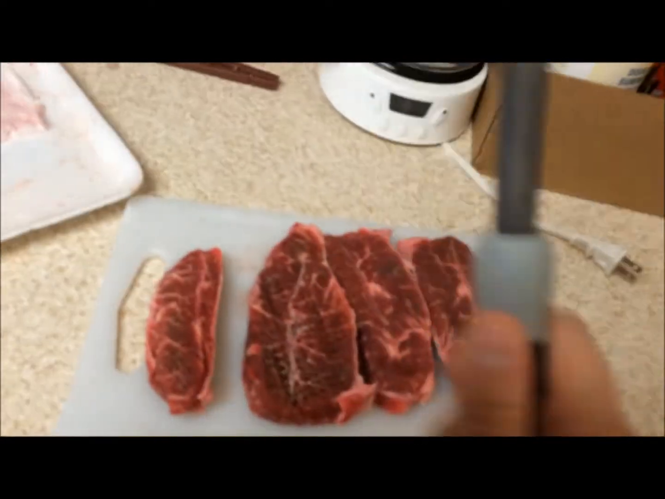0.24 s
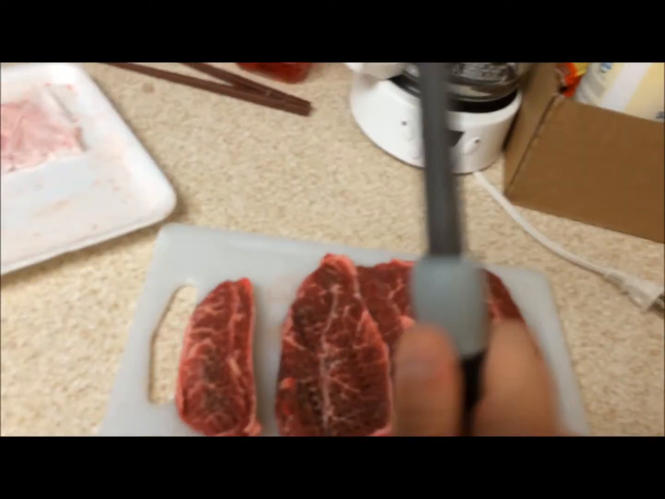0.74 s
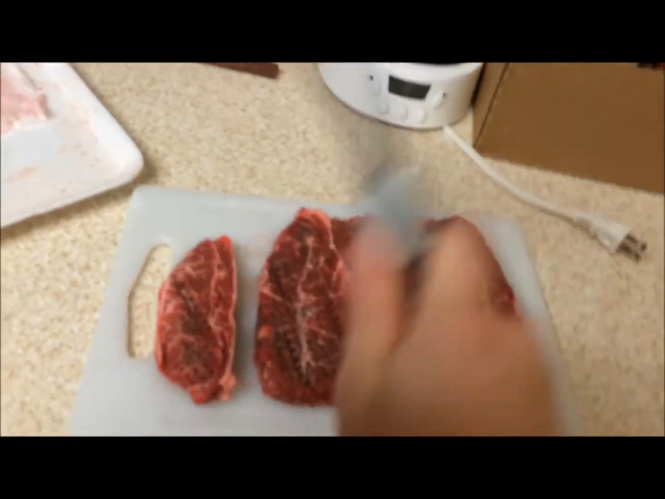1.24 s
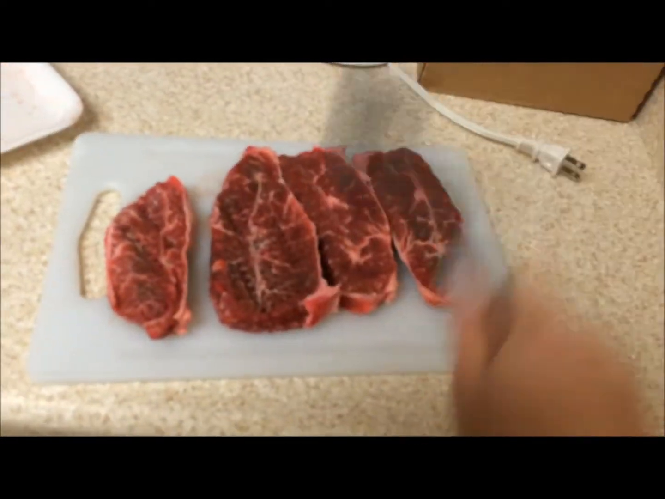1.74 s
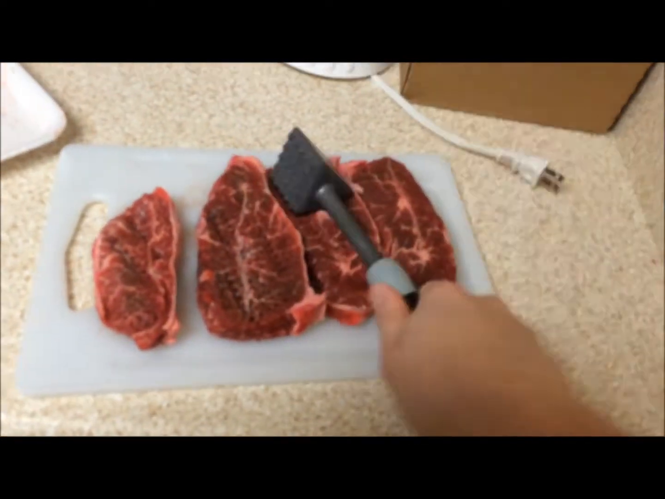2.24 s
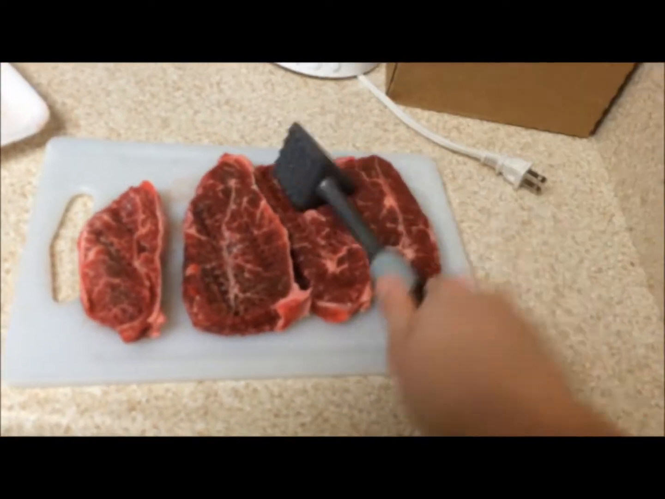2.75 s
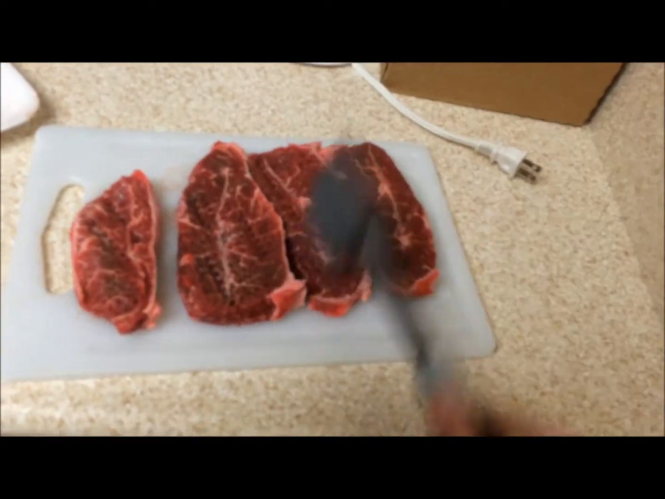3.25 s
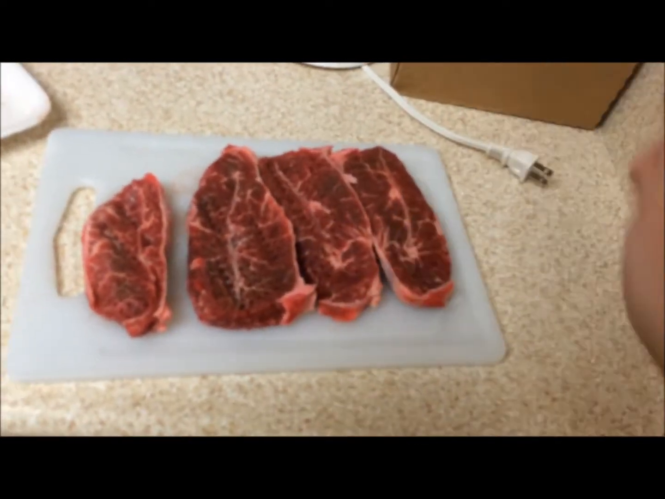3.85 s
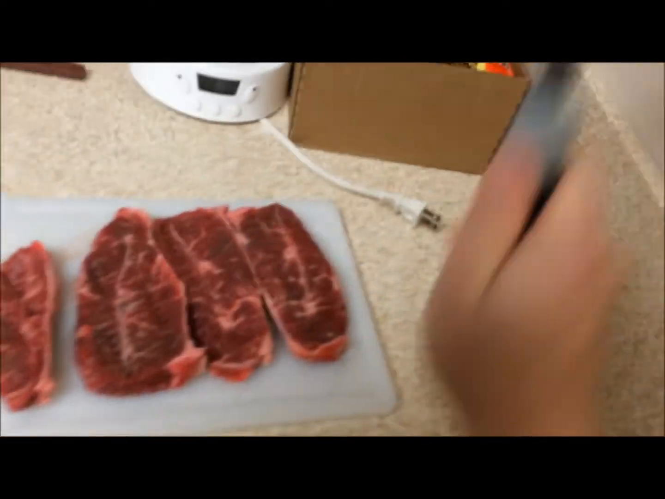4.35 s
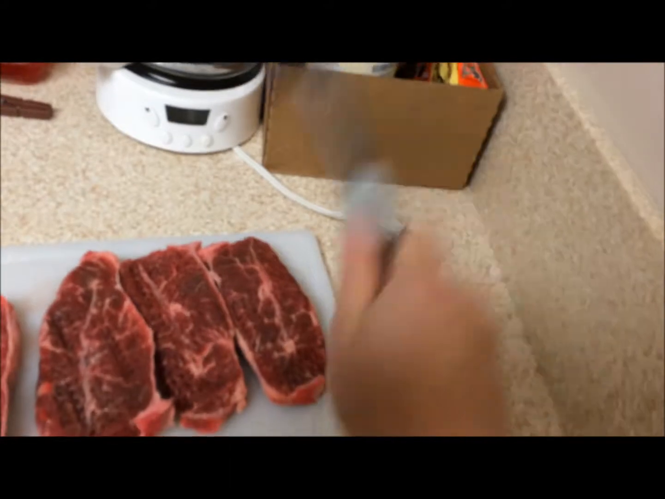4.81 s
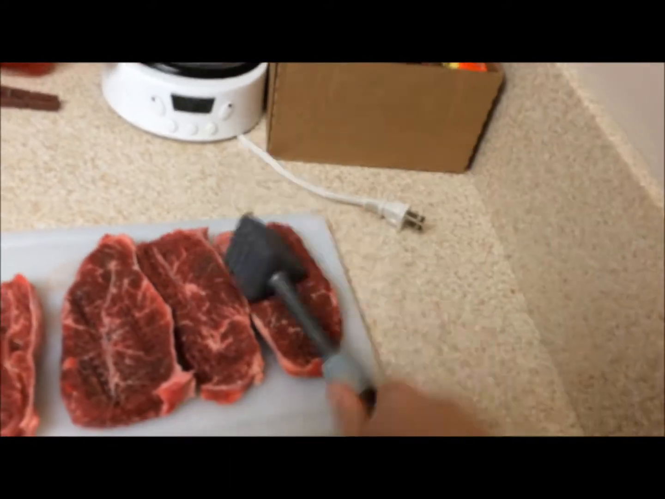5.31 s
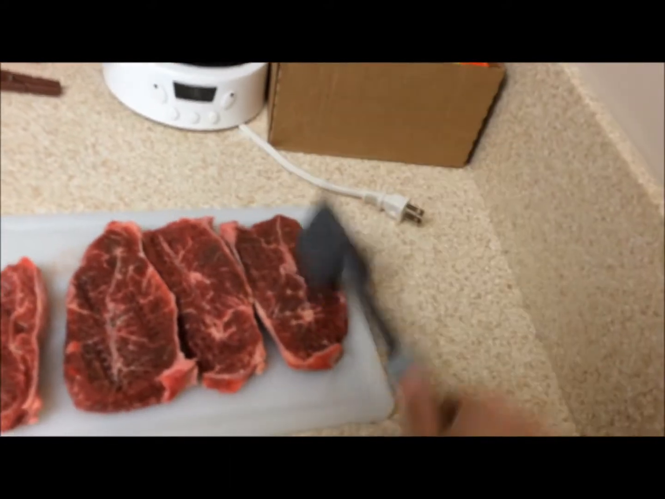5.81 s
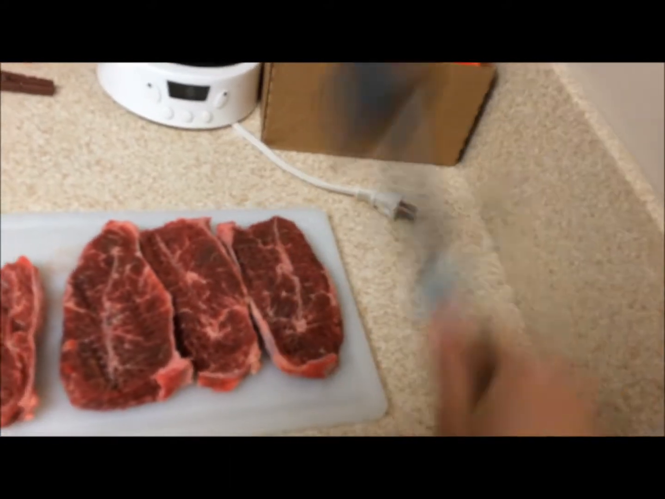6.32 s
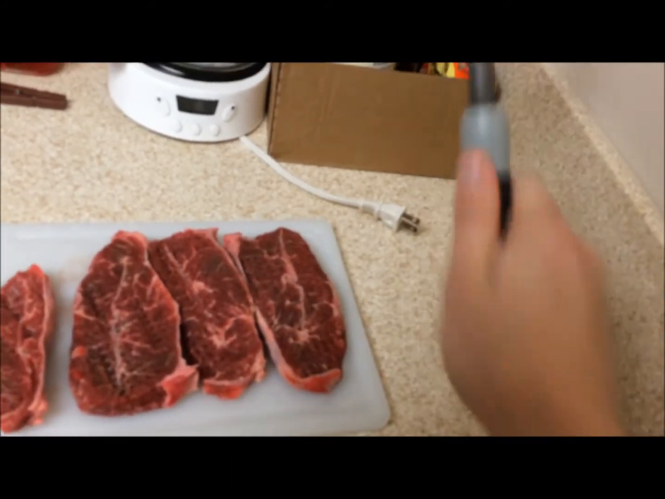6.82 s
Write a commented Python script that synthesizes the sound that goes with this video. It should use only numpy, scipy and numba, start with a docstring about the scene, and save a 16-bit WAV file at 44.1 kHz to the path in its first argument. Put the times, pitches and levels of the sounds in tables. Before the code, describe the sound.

Steady close-up blows of a meat mallet, each a wet slap and hard board knock, with the counter booming and the room ringing briefly.

```python
"""Steaks pounded on a kitchen counter

In a small hard kitchen, close to a phone's microphone, a mallet strikes meat on a plastic board sixteen times.
Each blow is a dull touch, a wet slap of noise clicks, then a board knock and a ringing mallet head.
Damped sines make the counter boom, and decaying noise rings the room over a steady quiet hush.
The phone's limiter flattens each attack, so the room swells behind it.
"""
import sys
import numpy as np
from scipy import signal
from scipy.fft import rfft, irfft
from scipy.io import wavfile
from scipy.ndimage import uniform_filter1d, minimum_filter1d
from numba import njit

SR = 44100
rng = np.random.default_rng(int(sys.argv[2]) if len(sys.argv) > 2 else 0)


def persist_wave(psi):
    """Save psi, clipped to +-1, as 16-bit WAV."""
    counts = np.round(np.clip(psi, -1, 1) * 32767).astype(np.int16)
    wavfile.write(sys.argv[1], SR, np.atleast_2d(counts).T)


N = 311787
T = np.arange(int(0.7 * SR)) / SR  # time axis of one blow, seconds


def undb(db):
    """Decibels to gain."""
    return 10 ** (np.asarray(db) / 20)


def unit(x):
    """Scale to rms 1."""
    return x / np.sqrt(np.mean(x ** 2))


def at(points, hz):
    """Read (frequency, value) points on a log-frequency axis."""
    point_hz, value = np.transpose(points)
    return np.interp(np.log(np.maximum(hz, 1)), np.log(point_hz), value)


def colour(x, points):
    """Shape the spectrum by (frequency, dB) points; rms 1."""
    hz = np.arange(len(x) // 2 + 1) * SR / len(x)
    return unit(irfft(rfft(x) * undb(at(points, hz)), len(x)))


def band(x, lo_hz, hi_hz):
    """Band-pass; rms 1."""
    sos = signal.butter(2, [lo_hz, hi_hz], "band", fs=SR, output="sos")
    return unit(signal.sosfilt(sos, x))


def noise():
    """White noise, one blow long."""
    return rng.standard_normal(len(T))


def fade(t60_s):
    """Exponential decay, falling 60 dB in t60_s."""
    return np.exp(-np.log(1000) * T / t60_s)


def rise(seconds):
    """Smooth onset."""
    return 1 - np.exp(-(T / seconds) ** 2)


def add(out, start_s, x):
    """Mix x into out from start_s, or from the beginning if that is earlier."""
    i = max(int(start_s * SR), 0)
    out[i:i + len(x)] += x[:max(len(out) - i, 0)]


def ring(modes, scatter_db, detune):
    """Damped modes; each spot on the board weights and loads them a little differently."""
    chance = rng.standard_normal((len(modes), 2))
    total = np.zeros(len(T))
    for (pitch_hz, level_db, t60_s), (weight, load) in zip(modes, chance):
        tone = np.sin(2 * np.pi * pitch_hz * (1 + detune * load) * T)
        total += undb(level_db + scatter_db * weight) * fade(t60_s) * tone
    return total


# the blows on the board; body is how resonant the spot is
# columns: start_s, force_db, wet_slap_db, slap_brightness_db, body_db
BLOWS = [(0.1217, -2, 5, 1, -0.5), (0.5821, -5, 4.5, -2, 0), (1.0271, -2.5, -0.5, 3, 0),
         (1.4838, 0, -3, 2.5, -2.5), (1.9395, 2, -2.5, 2.5, 0), (2.394, 2, -2.5, 0.5, 4),
         (2.8672, 2.5, -6, 4, 3.5), (3.3032, 1.5, 4.5, 2, 2), (3.7535, -1.1, -1.5, 8, 4.5),
         (4.1917, 1.5, -0.5, 3.5, 2.5), (4.633, 2.1, -1.5, 6, -0.5), (5.0399, -4.1, -2.5, -1, 4.5),
         (5.4688, 3, -4.5, 5.5, -3), (5.8954, -1, -3.5, 8, 3), (6.3131, -0.5, -3, 13, 3),
         (6.7541, -3, -2, 0.5, 5.5)]
# level of the mallet's ring, freest through the middle of the run
# columns: time_s, level_db
MALLET_FREEDOM = [(0, -6), (1.5, 1), (2.1, 9.5), (3.8, 5.5), (4.7, -2), (7, -5)]


def pounding(out):
    """Mallet blows in stages; force and the spot that is hit shape the stages."""
    walls = noise()
    for start_s, force_db, wet_db, bright_db, body_db in BLOWS:
        place = spot()
        bass_db = 0.44 * force_db  # a harder blow's shorter push adds little bass
        add(out, start_s - 0.16, undb(-37.5) * swell())
        add(out, start_s - 0.017, undb(-13 + 1.5 * force_db) * touch())
        add(out, start_s - 0.0011, undb(3.5 + wet_db) * slap(place, bright_db))
        add(out, start_s - 0.00026, undb(6.5) * flex())
        add(out, start_s + 0.00051, undb(bass_db) * counter())
        # the head bottoms out on the board a moment later
        bottom_s = start_s + 0.0102
        # a resonant spot on the board knocks louder
        knock_db = 0.79 * force_db + 0.34 * body_db
        add(out, bottom_s, undb(knock_db) * knock())
        mallet_db = force_db + np.interp(start_s, *np.transpose(MALLET_FREEDOM))
        add(out, bottom_s, undb(mallet_db) * mallet())
        # a wet spot also fills the room with more treble
        echo = kitchen(walls, place, bass_db - force_db, body_db, treble_db=0.35 * wet_db)
        add(out, start_s + 0.006, undb(-6.5 + force_db) * echo)


def spot(ripple_db=2.0, spacing_hz=170):
    """Each spot of meat colours its blow with random peaks and dips, growing up to 1500 Hz."""
    hz = np.linspace(0, SR / 2, num=2048)
    knots = rng.standard_normal(size=512)
    ripple = np.interp(hz / spacing_hz, np.arange(len(knots)), knots)
    return np.c_[hz + 1, ripple_db * np.minimum(hz / 1500, 1) * ripple]


# spectrum of the wet slap, before the spot and its brightness colour it
# columns: pitch_hz, level_db [dB per Hz, relative]
SLAP_COLOUR = [(100, 1), (400, -5), (750, 1.5), (1300, 5), (2300, 3.5), (3100, -0.5), (3900, -3.5),
               (4550, -3), (5400, -4.5), (6200, -6), (10000, -12.5), (15000, -19)]


def slap(place, bright_db, grain_db=3.0, t60_s=0.018, thinning=0.62):
    """Studs burst the wet surface in tiny clicks, thinner where brighter; juice squelches just after."""
    grain = undb(grain_db * np.minimum(rng.exponential(size=len(T)), 4))
    clicks = colour(colour(noise() * grain, SLAP_COLOUR), place)
    tilt = [(1500, -thinning * bright_db), (3500, 0), (9000, (1 - thinning) * bright_db)]
    clicks = colour(clicks, tilt)
    # the squelch is a brief second swell, 9 ms in
    squelch = undb(-22) * np.exp(-((T - 0.009) / 0.0025) ** 2)
    return clicks * rise(0.0022) * (fade(t60_s) + squelch)


# spectrum of the head knocking the plastic board
# columns: pitch_hz, level_db [dB per Hz, relative]
KNOCK_COLOUR = [(100, -2.5), (350, 8), (700, -3.5), (1200, 5), (2200, 1), (3200, -7), (5000, -19),
                (8000, -23), (15000, -38)]


def knock(t60_s=0.025):
    """The squeezed meat stiffens and the head knocks the plastic board: a short noise burst."""
    return colour(noise(), KNOCK_COLOUR) * rise(0.00069) * fade(t60_s)


# modes of the mallet's head and shaft, before scatter and detuning
# columns: pitch_hz, level_db [relative], t60_s
MALLET_MODES = [(1157, -34, .3), (1506, -36, .3), (1937, -34, .33), (1972, -37, .33), (2083, -43, .45),
                (2298, -28, .37), (3043, -39, .3)]


def mallet():
    """The mallet's head and shaft ring as damped sines."""
    return ring(MALLET_MODES, scatter_db=3.5, detune=0.0019)


# modes of the counter's first heavy flex, before scatter and detuning
# columns: pitch_hz, level_db [relative], t60_s
FLEX_MODES = [(79, -10, 0.077), (131, -2.5, 0.049), (349, 4, 0.017)]


def flex():
    """The counter flexes under the blow; soft meat spreads the push over a few milliseconds."""
    return rise(0.0055) * ring(FLEX_MODES, scatter_db=5.5, detune=0.012)


# modes of counter and board ringing on, before scatter and detuning
# columns: pitch_hz, level_db [relative], t60_s
COUNTER_MODES = [(48.3, -24.5, 0.34), (76, -16.5, 0.32), (137.8, -11.5, 0.39), (164.3, -15, 0.33),
                 (183, -16.5, 0.31), (232.9, -8.5, 0.28), (301, -15, 0.29), (332, -23.5, 0.17),
                 (375.1, -17.5, 0.19), (401.4, -19, 0.19), (427, -22.5, 0.41), (507.5, -25.5, 0.43),
                 (590, -26, 0.38), (693, -33.5, 0.56), (843, -27, 0.34), (1006, -24.5, 0.41)]


def counter():
    """Counter and board boom on as damped sines with a soft onset."""
    return rise(0.0053) * ring(COUNTER_MODES, scatter_db=1.06, detune=0.00678)


def touch(thump_hz=135, rustle_db=-9, press_s=0.0075, t60_s=0.046):
    """The head first presses into the soft meat: a small dull bump and a wet rustle."""
    rustle = band(band(noise(), 100, 2700), 100, 2700)
    bump = np.sin(2 * np.pi * thump_hz * T)
    return (bump + undb(rustle_db) * rustle) * rise(press_s) * fade(t60_s)


# spectrum of the soft low swell around each blow
# columns: pitch_hz, level_db [dB per Hz, relative]
SWELL_COLOUR = [(40, -4.5), (140, 6.5), (300, -4.5), (900, -16), (2000, -18), (4000, -29.5), (9000, -36.5),
                (15000, -46)]


def swell(peak_s=0.18, width_s=0.11):
    """A soft low swell of noise around each blow, peaking just after it."""
    return colour(noise(), SWELL_COLOUR) * np.exp(-((T - peak_s) / width_s) ** 2)


# the board hops and claps back on the counter
# columns: start_s, level_db
CLAPS = [(0.6205, 3)]
# spectrum of the clap
# columns: pitch_hz, level_db [dB per Hz, relative]
CLAP_COLOUR = [(300, -11), (1500, -7.5), (3100, 2), (3800, -8), (4600, 2.5), (6500, -6), (10000, -9.5),
               (15000, -22)]


def board_claps(out, t60_s=0.017):
    """Thin plastic lands flat on the counter: short, bright noise."""
    for start_s, level_db in CLAPS:
        clap = colour(noise(), CLAP_COLOUR) * rise(0.0033) * fade(t60_s)
        add(out, start_s, undb(level_db) * clap)


# a faint swish on one downswing
# columns: start_s, level_db
SWISHES = [(6.263, -42)]


def swishes(out, t60_s=0.37):
    """A short bright hiss of band-passed noise."""
    for start_s, level_db in SWISHES:
        hiss = band(noise(), 2500, 12000) * rise(0.0098) * fade(t60_s)
        add(out, start_s, undb(level_db) * hiss)


# spectrum of the kitchen's reflections, before each blow colours them
# columns: pitch_hz, level_db [dB per Hz, relative]
ROOM_COLOUR = [(30, -14), (70, -2.5), (100, 4.5), (150, 11.5), (225, 9), (270, -4.5), (320, 0.5), (430, 4),
               (580, -7), (1100, -6), (2000, -7.5), (2500, -15), (3050, -16), (3900, -21), (4550, -23.5),
               (15000, -34)]
# how long the kitchen rings
# columns: pitch_hz, t60_s
ROOM_DECAY = [(50, 0.37), (150, 0.27), (400, 0.33), (1000, 0.39), (2200, 0.41), (4500, 0.39), (8000, 0.33),
              (15000, 0.16)]


def kitchen(walls, place, boom_db, body_db, treble_db, same=0.67, build_s=0.02):
    """Dense reflections, partly the same for every blow; the highest treble dies first."""
    reflections = same * walls + np.sqrt(1 - same ** 2) * noise()
    spectrum = rfft(colour(reflections, ROOM_COLOUR))
    hz = np.arange(len(spectrum)) * SR / len(T)
    blow_colour = [(190, boom_db), (400, body_db), (900, 0), (2200, 0), (4000, treble_db)]
    spectrum = spectrum * undb(at(place, hz) + at(blow_colour, hz))
    # overlapping bands, each with its own decay
    centres_hz, t60s = np.transpose(ROOM_DECAY)
    tail = np.zeros(len(T))
    for row, t60_s in zip(np.eye(len(centres_hz)), t60s):
        share = at(np.c_[centres_hz, row], hz)
        tail += irfft(spectrum * share, len(T)) * fade(t60_s)
    # the wall and cupboards round the counter answer first and loudest
    near = undb(3) * fade(0.096)
    return tail * rise(build_s) * (1 + near)


# spectrum of the quiet kitchen
# columns: pitch_hz, level_db [dB per Hz, relative]
HUSH_COLOUR = [(18, -52), (30, -13), (147, 2), (200, -6), (328, -8), (384, -5.5), (794, -17.5),
               (1060, -11.5), (1690, -19.5), (5580, -34.5), (15000, -62)]


def hush(level_db=-47.0):
    """The quiet kitchen: steady coloured noise."""
    return undb(level_db) * colour(rng.standard_normal(N), HUSH_COLOUR)


def scene():
    """All the blows, the board's clap and the swish over the hush of the kitchen."""
    out = np.zeros(N)
    pounding(out)
    board_claps(out)
    swishes(out)
    return (out + hush())[None]


@njit
def follow(x, release):
    """Peak follower: jumps up at once, sinks back slowly."""
    out, level = np.empty(len(x)), 0.
    for i in range(len(x)):
        level = max(x[i], level * release)
        out[i] = level
    return out


def record(dry, ceiling=1.01, release_s=0.016, ahead_s=0.0022, rail=1.3, top_hz=15300):
    """A look-ahead limiter holds the peaks down, the converter rounds what is left; the top is cut."""
    window = 2 * max(int(ahead_s * SR), 1) + 1
    peak = follow(np.abs(dry[0]), np.exp(-1 / (release_s * SR)))
    # the centred window turns the gain down before the peak arrives
    lowest_gain = minimum_filter1d(ceiling / np.maximum(peak, ceiling), window)
    gain = uniform_filter1d(lowest_gain, window)
    rounded = rail * np.tanh(dry * gain / rail)
    low_pass = signal.ellip(8, 0.2, 70, top_hz, fs=SR, output="sos")
    return signal.sosfilt(low_pass, rounded)


dry = scene()
out = record(dry)
persist_wave(out)
```